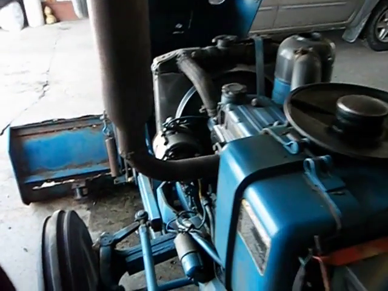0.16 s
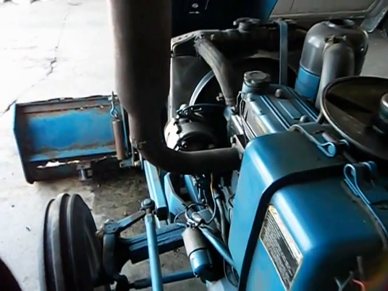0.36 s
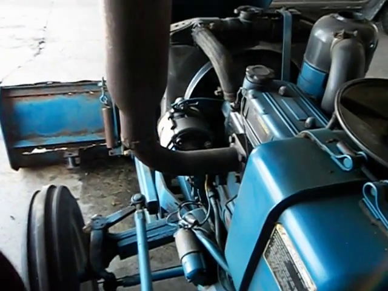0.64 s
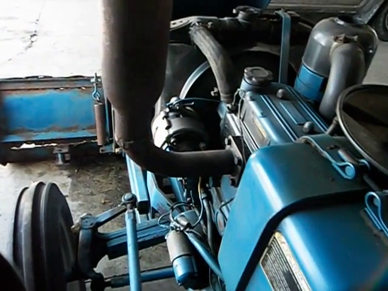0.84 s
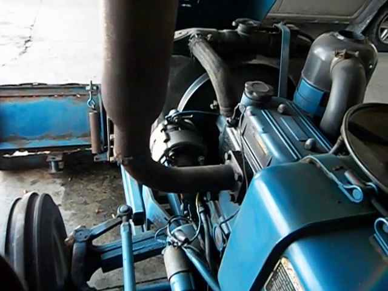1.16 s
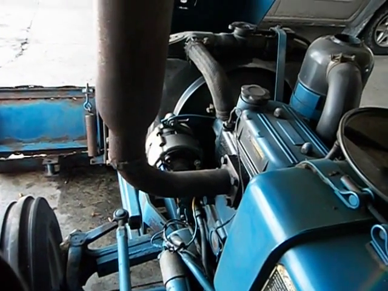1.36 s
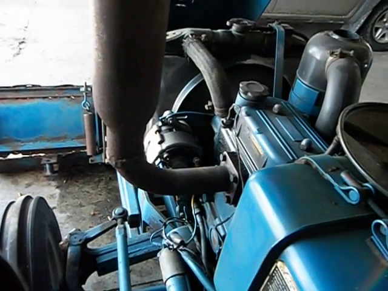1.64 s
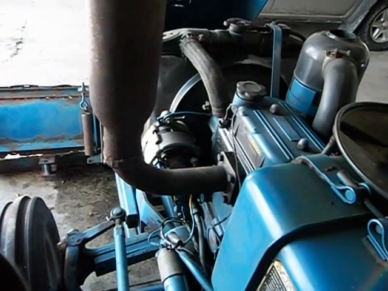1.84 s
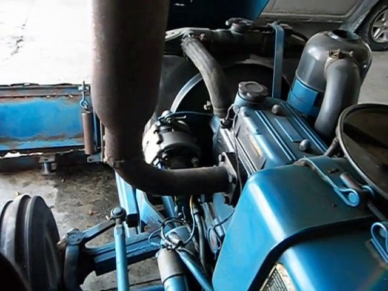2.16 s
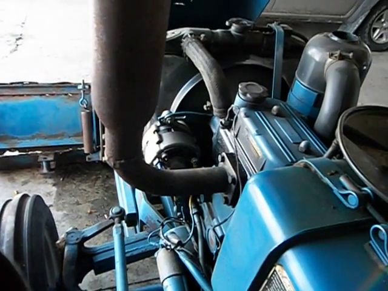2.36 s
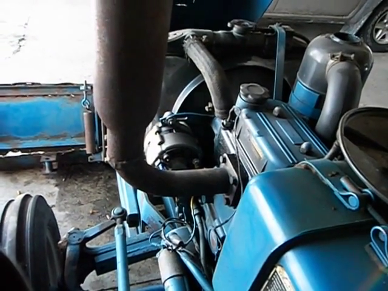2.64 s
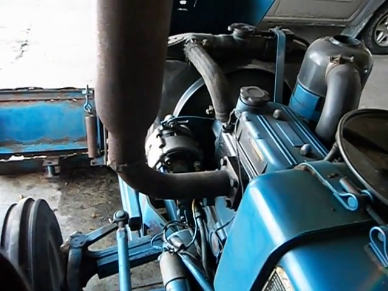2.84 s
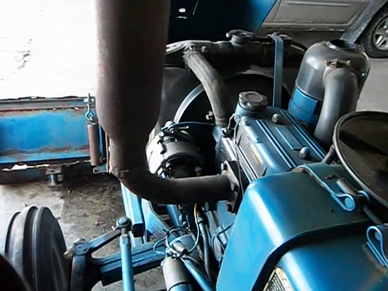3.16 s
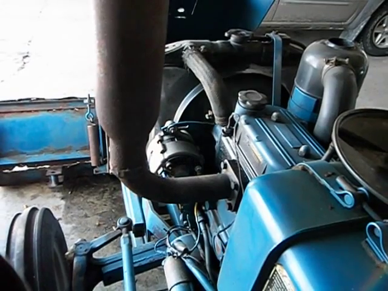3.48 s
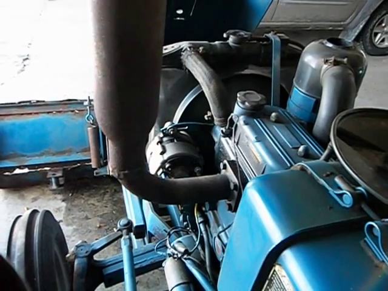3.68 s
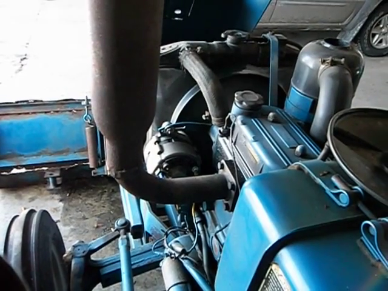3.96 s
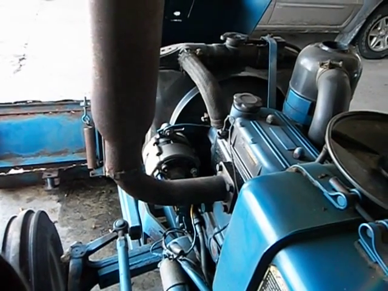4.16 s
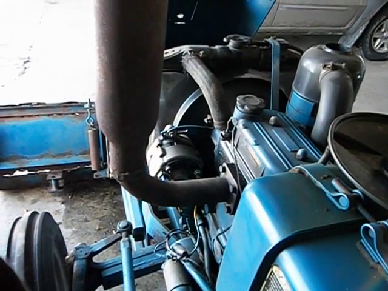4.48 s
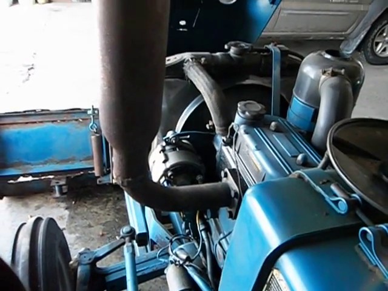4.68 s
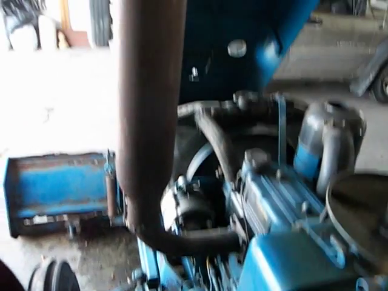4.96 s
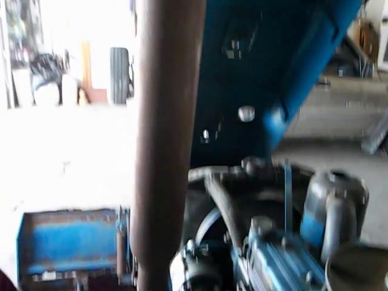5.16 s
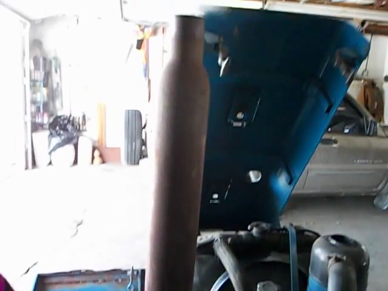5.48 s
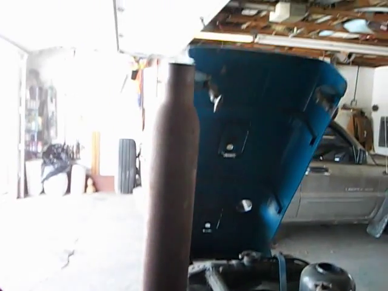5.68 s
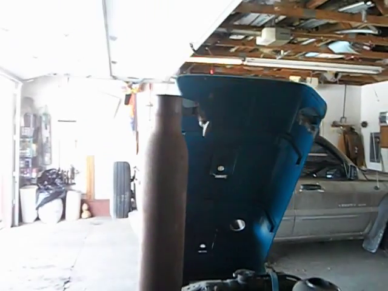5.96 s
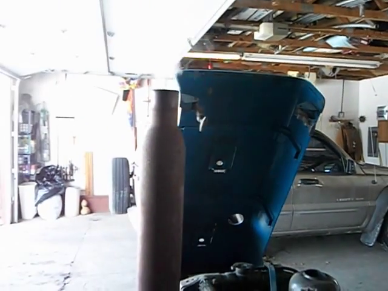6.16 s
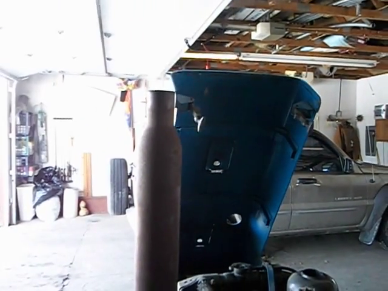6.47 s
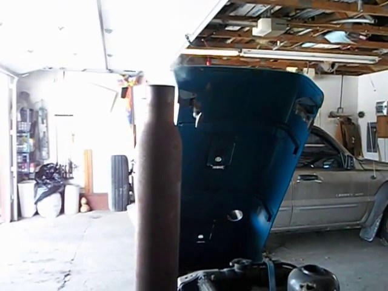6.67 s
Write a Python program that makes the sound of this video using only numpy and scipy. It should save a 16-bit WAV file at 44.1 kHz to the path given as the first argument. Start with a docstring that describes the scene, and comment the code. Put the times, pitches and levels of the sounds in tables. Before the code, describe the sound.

A cold diesel tractor engine is already cranking at 0 seconds and keeps turning over for the whole seven seconds without firing. The microphone is close to the engine, in a garage with short, hard reflections. Beats start at about three a second and gradually quicken to about three and a half by 3 seconds, staying near that or slightly faster to the end. In each one the starter gears bite with a dry, chattering rasp that strains upward, then knock and give a stuttering high metallic ring; a moment later the exhaust valve opens with a sharp manifold clank, a puff of air and a deep hollow stack thump. Harder gear clacks stand out near 0.05, 1.1, 2, 3.2 and 4.1 seconds. A rough motor whine rises and sags with the crank over constant light rattling and faint low rumble. After 5.5 seconds knocks are mostly softer, but cranking continues to the end.

```python
"""In a garage a cold diesel tractor engine turns over on its starter, about 3.4 beats a second, and does not fire.
In each beat the starter gears rasp, as tooth-pulsed noise and housing resonances, while they take up
the compression; they knock and ring near its top. Then the exhaust valve opens: the manifold clanks and
the stack thumps, as air pulses sent through decaying pipe modes. Motor whine and a low chassis sway lie below.
A camera with two close microphone ports stands by the engine."""
import sys
import numpy as np
from scipy import signal
from scipy.fft import rfft, irfft, next_fast_len
from scipy.io import wavfile
from scipy.ndimage import map_coordinates

SR = 44100
rng = np.random.default_rng(int(sys.argv[2]) if len(sys.argv) > 2 else 0)


def file_out(sig):
    """Save sig as 16-bit WAV at sys.argv[1]."""
    # one column per channel
    cols = np.atleast_2d(sig).T
    # limit, then scale
    lim = np.clip(cols, -1, 1)
    pcm = np.round(lim * 32767).astype(np.int16)
    wavfile.write(sys.argv[1], SR, pcm)


N = 300762

# Compressions, one a row: (gears bite [s], exhaust valve opens [s], gear load [dB], knock [dB], exhaust [dB])
BEATS = [(.005, .196, -20.5, -27, -14), (0.322, 0.5235, -21, -16.5, -13), (0.651, 0.847, -21.5, -15, -13.5),
         (.974, 1.164, -20, -15.5, -13), (1.287, 1.48, -20, -22.5, -13.5), (1.625, 1.785, -21, -17, -14),
         (1.925, 2.089, -20.5, -19.5, -11), (2.245, 2.3877, -21, -25, -11),
         (2.542, 2.6857, -18.5, -18, -13), (2.832, 2.986, -19, -19.5, -12),
         (3.136, 3.2818, -20, -25.5, -13), (3.436, 3.571, -19.5, -22, -10),
         (3.728, 3.8594, -19.5, -20.5, -11.5), (4.018, 4.1425, -19, -18, -13.5),
         (4.301, 4.4283, -20, -19.5, -11.5), (4.583, 4.7122, -20, -17.5, -12),
         (4.872, 4.9992, -20.5, -20.5, -13), (5.162, 5.2805, -22, -22.5, -12.5),
         (5.451, 5.5571, -23.5, -24.5, -12), (5.718, 5.832, -20.5, -32, -10.5),
         (6.001, 6.1098, -21, -27.5, -16), (6.277, 6.3875, -21.5, -24, -12),
         (6.551, 6.6634, -19.5, -26, -11.5)]
# Colour of the gear case: (frequency [Hz], relative density [dB per Hz])
CASE_COLOUR = [(40, -13.5), (80, -2.5), (170, 2), (300, -3), (550, -8.5), (1050, -2), (1400, -7.5),
               (1750, -5.5), (2120, -4), (2400, -11.5), (3600, -5), (4200, -9.5), (4500, -8), (6400, -7),
               (7400, -20.5)]
# Colour of the loaded drive: (frequency [Hz], relative density [dB per Hz])
GROWL_COLOUR = [(120, -26.5), (230, 0.5), (400, -9), (600, -7.5), (1050, 2), (1400, -6.5), (1750, -3),
                (2120, 3.5), (2400, -16.5), (4200, -15), (5200, -5.5), (7400, -16)]
# Colour of the escaping air: (frequency [Hz], relative density [dB per Hz])
PUFF_COLOUR = [(200, -7.5), (550, -6.5), (800, -4.5), (1100, -12), (1400, -6.5), (1950, -6), (2400, -14.5),
               (2800, -9), (3600, -12.5), (4400, -3.5), (5300, -11), (6400, -7.5), (7500, -8)]

TOP_SHARE = 0.219  # of a beat, from the top of compression to the opening of the valve
SLOSH_SHARE, RETURN_SHARE = 0.2284, 0.268  # of a beat, from the gulp to the slosh and to the outward push
TEETH_PER_BEAT = 64
WHINE_PER_BEAT = 280  # cycles of the armature tone
BOUNCE_HZ = 35  # the pinion bounces in its backlash after each bite
TICKS_PER_S, TICK_SCATTER_DB = 120, 3.5  # single teeth catch at random under load
LIGHT_DB, LIGHT_DB_PER_S = -25, -0.325  # the drive running light between compressions, and its slow easing
PORT_LAG = 6.45e-5  # [s] the left port hears the engine later
TOP_HZ = 7750  # band limit of the camera


def amp(db):
    """Decibels to gain."""
    return 10 ** (np.asarray(db) / 20)


def unit(x):
    """x at rms 1."""
    return x / np.sqrt(np.mean(x ** 2) + 1e-20)


def clock():
    """The time of each sample in seconds."""
    return np.arange(N) / SR


def noise():
    """White noise as long as the scene."""
    return rng.standard_normal(N)


def along(points, hz):
    """(Hz, value) points read on a log frequency axis."""
    f, v = np.transpose(points)
    return np.interp(np.log(hz + 1), np.log(f + 1), v)


def wobble(rate):
    """A smooth random curve, rate knots a second."""
    return map_coordinates(rng.standard_normal(4096), [clock() * rate], mode="wrap")


def filtered(x, response):
    """x times a complex response of frequency."""
    m = next_fast_len(N + SR // 2)
    return irfft(rfft(x, m) * response(np.fft.rfftfreq(m, 1 / SR)), m)[..., :N]


def coloured(x, spectrum):
    """x shaped by the given spectrum, thinned in the lowest bass, at rms 1."""
    return unit(filtered(x, lambda hz: amp(along(spectrum, hz)) * hz / (hz + 20)))


def ringing(modes):
    """Resonances kept ringing by random contact, at rms 1."""
    def bell(hz):
        return sum(amp(db) / np.sqrt(width) / (1 + (1.3 * (hz - centre) / width) ** 2)
                   for centre, width, db in modes)
    return unit(filtered(noise(), bell))


def bursts(times, levels_db, rise, t60):
    """An envelope that swells and dies away at each of the times."""
    t = np.arange(SR // 3) / SR
    shape = (1 - np.exp(-(t / rise) ** 2)) * amp(-60 * t / t60)
    out = np.zeros(N + SR)
    for s, db in zip(times, levels_db):
        out[max(round(s * SR), 0):][:len(t)] += amp(db) * shape / shape.max()
    return out[:N]


def swell(times, levels_db):
    """An envelope through a few (s, dB) corners, silent outside them."""
    out = np.zeros(N)
    a, b = np.clip([int(times[0] * SR), int(times[-1] * SR)], 0, N)
    out[a:b] = amp(np.interp(np.arange(a, b) / SR, np.maximum.accumulate(times), levels_db))
    return out


def strokes():
    """When the gears bite, the piston tops out and the exhaust valve opens, in each beat."""
    bites, opens = np.transpose(BEATS)[:2]
    return bites, opens - TOP_SHARE * np.gradient(opens), opens


def levels():
    """The dB of the load, the knock and the exhaust, in each beat."""
    return np.transpose(BEATS)[2:]


def crank(swing=.1, fastest=.4):
    """Crank travel in beats: the shaft races after each exhaust and labours into the next compression."""
    opens = strokes()[2]
    rate = np.interp(clock(), (opens[1:] + opens[:-1]) / 2, 1 / np.diff(opens))
    beat = np.cumsum(rate) / SR - opens[0] * rate[0]  # whole numbers near the valve openings
    speed = rate * (1 + swing * np.cos(2 * np.pi * (beat - fastest)))
    return np.cumsum(speed) / SR


def light_running():
    """The gain of the unloaded drive, easing slowly."""
    return amp(LIGHT_DB + LIGHT_DB_PER_S * clock())


def teeth(depth_db, slip):
    """Sliding noise that pulses as each tooth meshes; backlash makes the timing slip."""
    mesh = TEETH_PER_BEAT * crank() + slip * wobble(60)
    return amp(depth_db * np.cos(2 * np.pi * mesh)) * noise()


def ticks(t60):
    """The envelope of single teeth catching, at rms 1."""
    t = np.arange(SR // 25) / SR
    caught = rng.random(N) < TICKS_PER_S / SR
    hits = caught * amp(TICK_SCATTER_DB * np.clip(noise(), -2, 2))
    return unit(signal.fftconvolve(hits, amp(-60 * t / t60))[:N])


def garage(x):
    """The walls' answer: decaying noise in which each frequency dies at its own speed."""
    # Decay of the room: (frequency [Hz], t60 [s])
    room_decay = [(70, 0.88), (300, 0.29), (2000, 0.26), (7000, 0.46)]
    hz, t, z = signal.stft(rng.standard_normal(SR // 2), SR, nperseg=256)
    decay = amp(-60 * t / along(room_decay, hz)[:, None])
    tail = signal.istft(z * decay, SR, nperseg=256)[1]
    later = np.pad(x, (300, 0))  # the walls answer a few milliseconds late
    return signal.fftconvolve(later, tail / np.linalg.norm(tail))[:N]


def chassis():
    """The low sway of the tractor's chassis: bass resonances kept moving by noise."""
    # Modes of the chassis: (frequency [Hz], width [Hz], relative level [dB])
    sway_modes = [(32, 14, -12.5), (55, 14, -4.5), (81.6, 10, 0.5)]
    return ringing(sway_modes)


def motor(db, strain_db, blur, flutter_db):
    """The starter's blurred whine bends with the speed of the crank and groans into each compression."""
    # Whine of the motor and its gears: (multiple of the armature tone [ratio], relative level [dB])
    whine_tones = [(.77, -13), (1, -8), (1.66, -3.5), (1.83, -12.5), (2, -1.5), (3, -6.5), (4, 0.5)]
    turn = WHINE_PER_BEAT * crank()
    tones = np.zeros(N)
    for k, level in whine_tones:
        flutter = amp(level + flutter_db * wobble(80))
        tones += flutter * np.sin(2 * np.pi * (k * turn + blur * wobble(150)))
    strain = bursts(strokes()[1] - .025, levels()[0] + strain_db, rise=.022, t60=.2)
    whine = amp(db) * light_running() * coloured(tones, CASE_COLOUR)
    return whine + strain * coloured(tones, GROWL_COLOUR)


def drive(chatter_db):
    """The gear case rattles all the time, growls under load and knocks as the backlash turns over."""
    # Colour of the knock: (frequency [Hz], relative density [dB per Hz])
    knock_colour = [(300, -31.5), (700, -13.5), (1030, -4), (1400, -15), (1750, -10.5), (2500, -22.5),
                    (7000, -35)]
    bites, tops, opens = strokes()
    load_db, knock_db, _ = levels()
    rattle = amp(.9 * wobble(70))
    light = light_running() * rattle * coloured(teeth(depth_db=0.2, slip=0.26), CASE_COLOUR)
    load = np.zeros(N)
    for bite, top, end, db in zip(bites, tops, opens, load_db):
        corners = [bite, top - .03, top - .002, top + 0.037, top + 0.038, end + 0.02]
        load += amp(db) * swell(corners, [-11.5, -8.0, -1.7, 1.0, -3.5, -5.5])
    chatter = amp(chatter_db * wobble(110))
    growl = load * chatter * coloured(teeth(depth_db=1.0, slip=0.22), GROWL_COLOUR)
    knock = bursts(tops - .007, knock_db, rise=0.0054, t60=.06) * coloured(noise(), knock_colour)
    return light + growl + amp(4.5) * knock


def pinion(flare_db, again_db, scatter_db, wait, rest_db, stutter_db, lift_hz):
    """A high, stuttering ring, swaying in pitch, flares after each top of compression and with the exhaust."""
    # Ringing of the pinion and flywheel: (frequency [Hz], width [Hz], relative level [dB])
    ring_modes = [(4115, 45, 2), (4200, 110, -3.5), (5170, 55, -13)]
    _, tops, opens = strokes()
    first, second = scatter_db * rng.standard_normal((len(tops), 2)).T
    flare = bursts(tops + wait, flare_db + first, rise=0.0045, t60=0.24)
    again = bursts(opens + 0.0027, again_db + second, rise=0.0023, t60=0.23)
    ring = signal.hilbert(ringing(ring_modes))
    ring = ring / (np.abs(ring) + .5)  # friction holds the ring up
    ring = ring * amp(stutter_db * wobble(260))  # but roughens it
    lift = lift_hz * np.cos(2 * np.pi * (crank() - .1))  # pitch shift in Hz, one cycle a beat
    ring = unit(np.real(ring * np.exp(2j * np.pi * np.cumsum(lift) / SR)))
    return ring * np.sqrt(flare ** 2 + again ** 2 + amp(rest_db) ** 2)


def rasp(bite_db, bounce_db, bounce_life, chatter_db, grain_db, housing_db, ticks_db):
    """The starter bites, bounces in its backlash as the compression builds and lets go past its top."""
    # Loudest single clacks of the gear teeth: (time [s], relative level [dB])
    clack_hits = [(0.045, -2.5), (0.061, 4.5), (0.3543, -9), (1.0827, -1), (1.29, -1.5), (1.958, -5.5),
                  (1.977, 1), (2.857, -6), (3.1662, 0), (4.0824, 3.5)]
    # Colour of the rasping teeth: (frequency [Hz], relative density [dB per Hz])
    rasp_colour = [(100, -14.5), (300, -12), (550, -9.5), (1050, -7), (1400, -11.5), (1900, -9),
                   (2400, -14.5), (2760, -11), (3050, -7), (3560, -2.5), (4500, -5), (5300, -7),
                   (6400, -10), (7400, -21)]
    # Starter housing, rung while the teeth are loaded: (frequency [Hz], width [Hz], relative level [dB])
    housing_modes = [(2776, 260, 0.5), (3240, 81, -7.5), (3570, 100, -1.5), (3740, 83, -8.5),
                     (3965, 97, -2.5)]
    bites, tops, opens = strokes()
    level = np.zeros(N)
    for s, top, end, db in zip(bites, tops, opens, levels()[0]):
        corners = [s - .002, s + .001, s + .012, s + .03, top - .004, end - .025, end + .03]
        level += amp(db) * swell(corners, [-18, bite_db, -2.5, -.7, .83, -6.5, -18])
    latest = np.maximum(np.searchsorted(bites - .002, clock()) - 1, 0)
    age = np.abs(clock() - bites[latest])  # seconds from the latest bite
    bounce = bounce_db * np.exp(-age / bounce_life) * np.cos(2 * np.pi * BOUNCE_HZ * (age - .004))
    rough = amp(bounce + chatter_db * wobble(90) + grain_db * wobble(600))
    chatter = unit(rough * np.hypot(1, amp(ticks_db) * ticks(t60=0.021)))
    sliding = coloured(teeth(depth_db=-0.5, slip=0.28), rasp_colour)
    gears = level * chatter * (sliding + amp(housing_db) * ringing(housing_modes))
    clacks = bursts(*np.transpose(clack_hits), rise=0.001, t60=0.051) * coloured(noise(), rasp_colour)
    return amp(2.0) * gears + amp(-14.5) * clacks


def manifold(db, crack_db):
    """Each opening of the exhaust valve cracks and strikes the manifold's modes a little differently."""
    # Clank of the manifold: (nominal frequency [Hz], nominal level [dB], t60 [s])
    clank_modes = [(463, -14.5, 0.045), (679, -8, 0.041), (813, 8.5, 0.02), (1115, -6.5, 0.079),
                   (1774, 0.5, 0.058), (1988, -7, 0.076)]
    t = np.arange(SR // 10) / SR
    opens, exhaust_db = strokes()[2], levels()[2]
    chances = rng.standard_normal((len(opens), 2, len(clank_modes)))
    out = np.zeros(N + SR)
    for s, blow_db, (tune, force) in zip(opens, exhaust_db, chances):
        ring = np.zeros(len(t))
        for (hz, level, t60), d, f in zip(clank_modes, tune, force):
            decay = amp(level + 2.3 * f - 60 * t / t60)
            ring += decay * np.sin(2 * np.pi * hz * (1 + 0.032 * d) * t)
        onset = 1 - np.exp(-t / 0.0023)
        out[round((s + .0045) * SR):][:len(t)] += amp(blow_db + db) * ring * onset
    crack = bursts(opens + 0.0034, exhaust_db, rise=0.00053, t60=0.024) * coloured(noise(), PUFF_COLOUR)
    return out[:N] + amp(crack_db) * crack


def stack(width, slosh_width, return_db, slosh_db):
    """The open valve gulps air down the stack; it sloshes, and a quarter beat later the piston pushes it out."""
    # Modes of the exhaust stack and muffler: (frequency [Hz], nominal level [dB], t60 [s])
    pipe_modes = [(58, -7, .13), (114.5, -1.5, 0.064), (195, -12, 0.09), (70, -22, 0.34), (79.5, -47, 0.69)]
    opens, exhaust_db = strokes()[2], levels()[2]
    t = np.arange(SR // 2) / SR
    early, swing = .01, .0075  # [s] room for the front of the pulse; half a cycle of the slosh

    def push(at, spread):
        return np.exp(-.5 * ((t - early - at) / spread) ** 2) / (spread * SR * np.sqrt(2 * np.pi))

    def slosh(at):
        return push(at, slosh_width) - push(at - swing, slosh_width) - push(at + swing, slosh_width)

    chances = rng.standard_normal((len(opens), len(pipe_modes)))
    out = np.zeros(N + SR)
    hiss = np.zeros(N)
    for s, db, beat, chance in zip(opens, exhaust_db, np.gradient(opens), chances):
        flow = -push(0.00082, width)
        flow += amp(slosh_db) * slosh(SLOSH_SHARE * beat)
        flow += amp(return_db) * push(RETURN_SHARE * beat, 0.0013)
        pipe = np.zeros(len(t))
        for (hz, level, t60), c in zip(pipe_modes, chance):
            pipe += amp(level + 2.1 * c) * np.cos(2 * np.pi * hz * t) * amp(-60 * t / t60)
        thump = signal.fftconvolve(flow, pipe)[:len(t)]
        out[round((s - early) * SR):][:len(t)] += amp(db + 12.5) * thump
        hiss += amp(db) * swell([s + 0.0044, s + .013, s + .014, s + .027], [1.4, 0.3, -7.0, -23.5])
    return out[:N], amp(3.0) * hiss * coloured(noise(), PUFF_COLOUR)


def scene():
    """Starter, exhaust and chassis in the garage, reaching the two ports a moment apart."""
    whine = motor(db=-8.5, strain_db=-5.5, blur=0.14, flutter_db=5.0)
    ring = pinion(flare_db=-15.0, again_db=-21.5, scatter_db=1.5, wait=0.0015,
                  rest_db=-37, stutter_db=3.0, lift_hz=45)
    bite = rasp(bite_db=0.0, bounce_db=3.0, bounce_life=0.071, chatter_db=1.63,
                grain_db=1.4, housing_db=-3.5, ticks_db=-6)
    starter = bite + drive(chatter_db=1.9) + ring + whine
    thump, puff = stack(width=0.00091, slosh_width=0.0025, return_db=-12.5, slosh_db=-11.0)
    metal = starter + puff + manifold(db=-2.4, crack_db=-1.8)
    walls = amp(-11.5) * garage(metal) + amp(-28.5) * garage(thump)
    sound = metal + thump + amp(-33.0) * chassis() + walls
    sides = np.array([[-1], [1]])  # left, right: half the lag each way
    return filtered(sound, lambda hz: np.exp(1j * np.pi * hz * PORT_LAG * sides))


def record(dry):
    """The camera thins the lowest bass, rounds off the highest peaks and cuts steeply above its band limit."""
    x = filtered(dry, lambda hz: 1j * hz / (1j * hz + 6))
    x = x / (1 + np.abs(x) ** 14) ** (1 / 14)
    return filtered(x, lambda hz: 1 / np.sqrt(1 + (hz / TOP_HZ) ** 70))


dry = scene()
out = record(dry)
file_out(out)
```